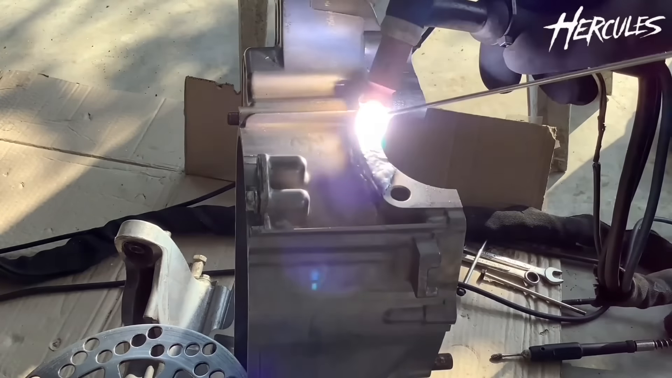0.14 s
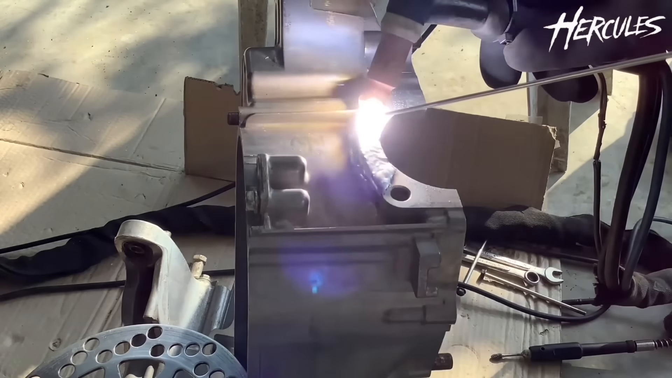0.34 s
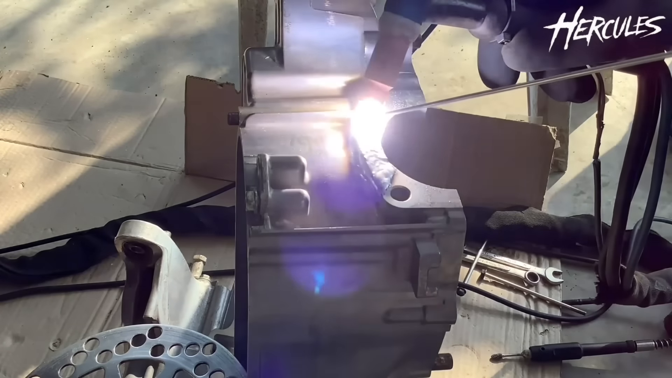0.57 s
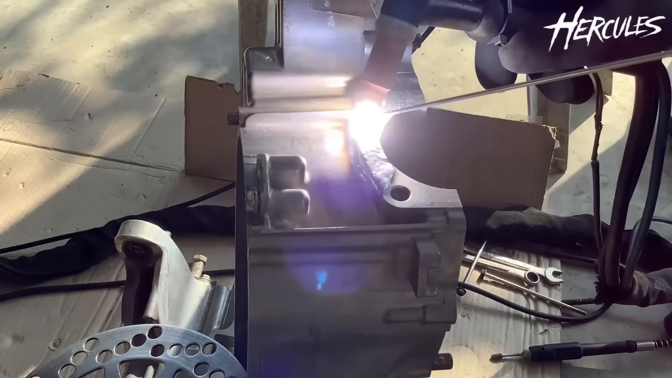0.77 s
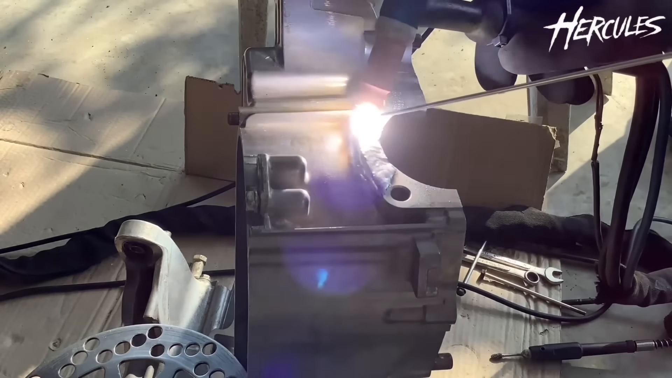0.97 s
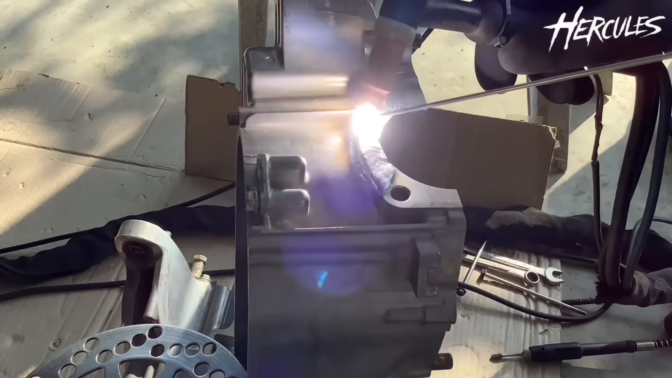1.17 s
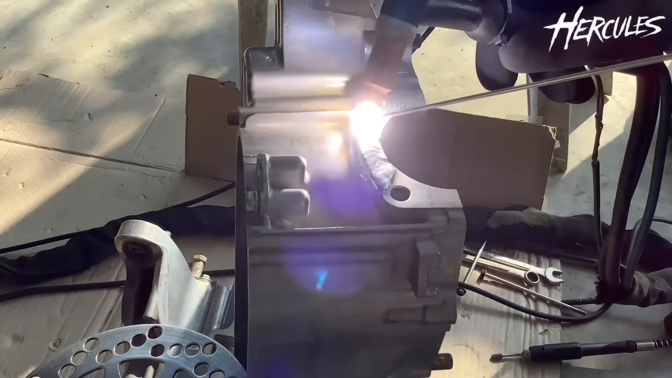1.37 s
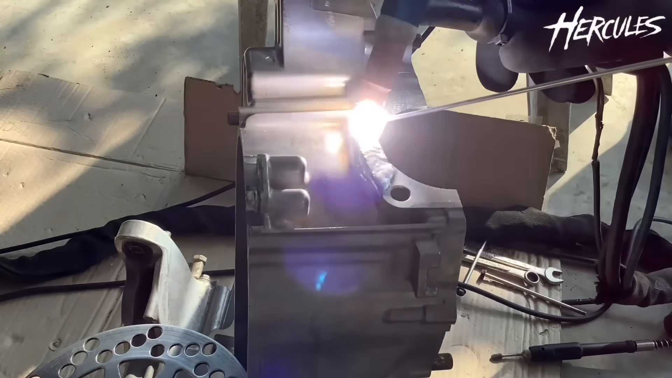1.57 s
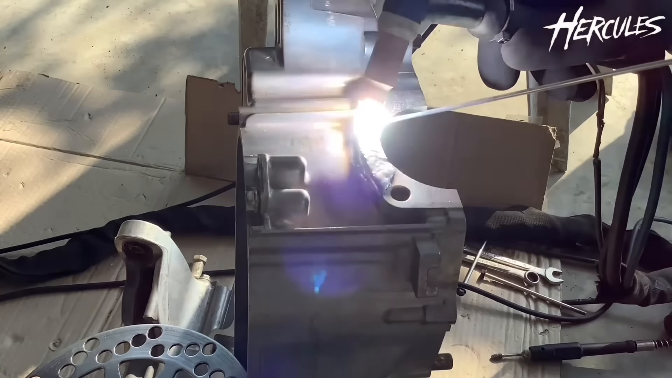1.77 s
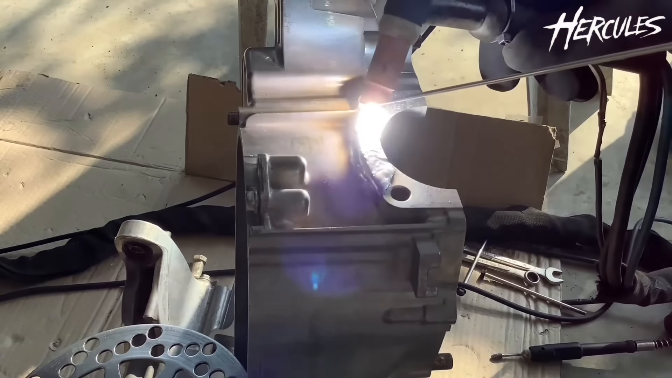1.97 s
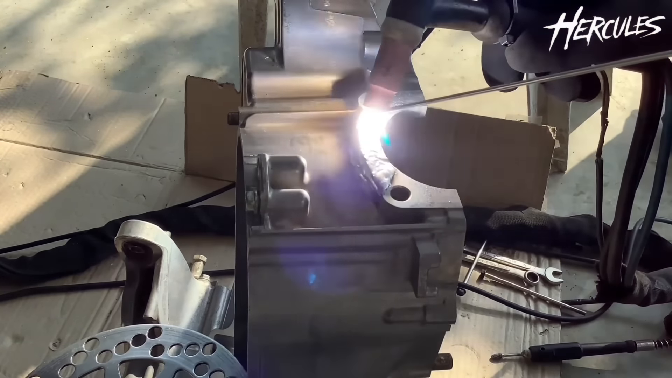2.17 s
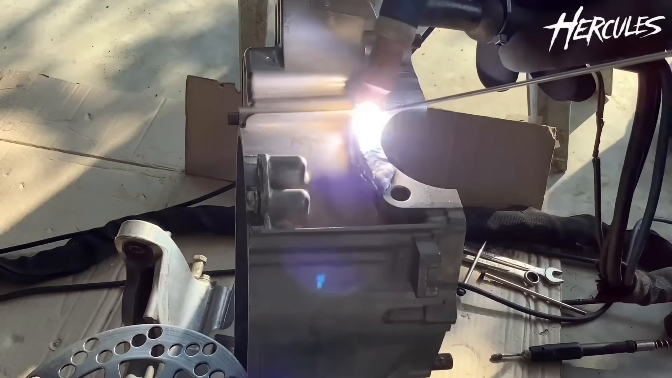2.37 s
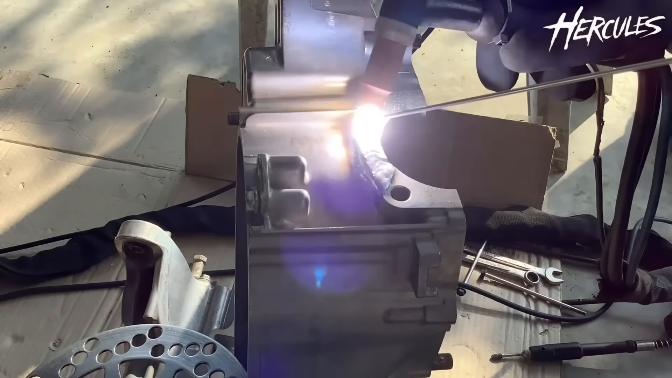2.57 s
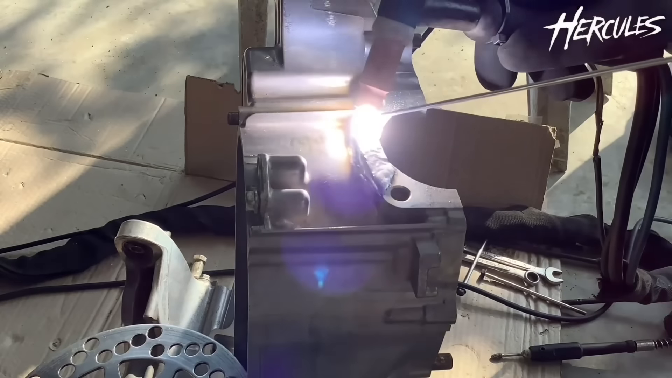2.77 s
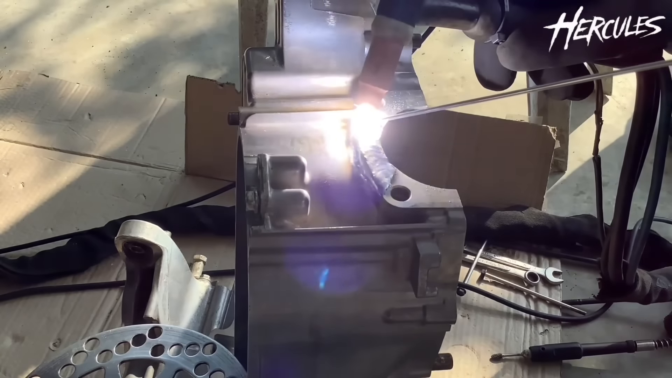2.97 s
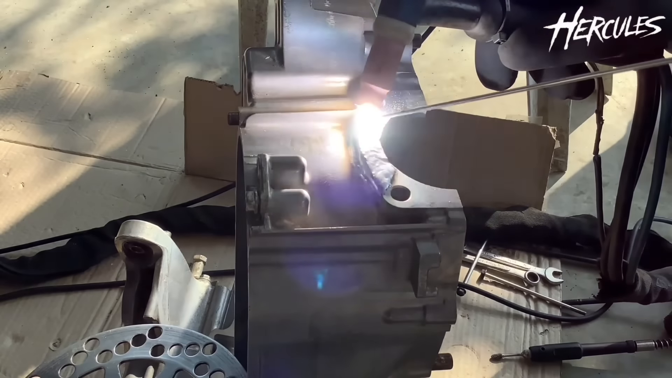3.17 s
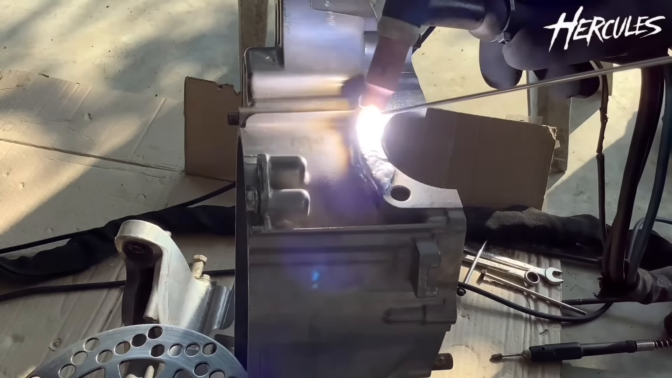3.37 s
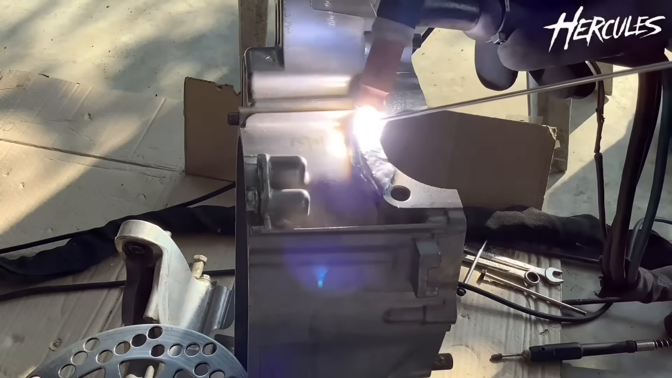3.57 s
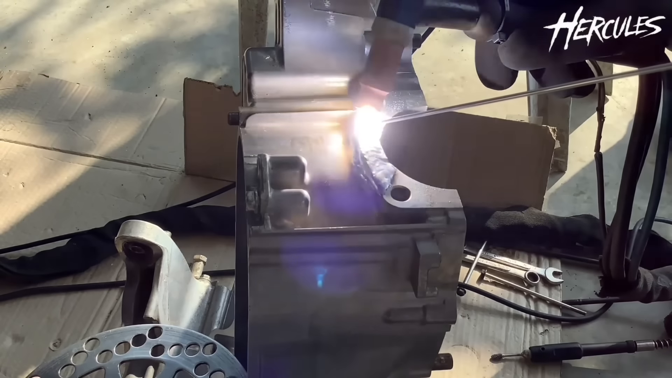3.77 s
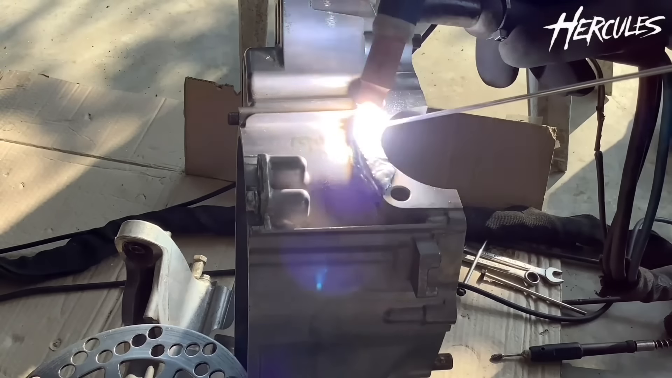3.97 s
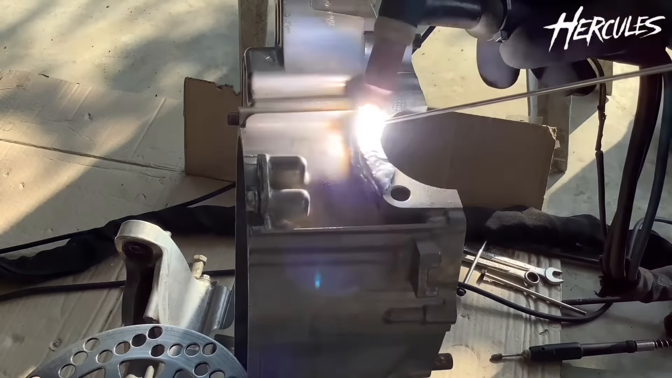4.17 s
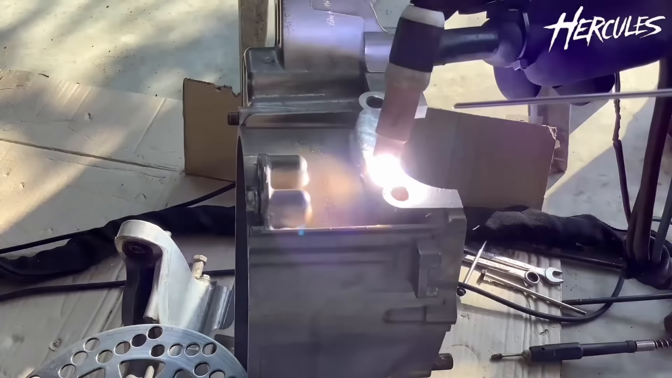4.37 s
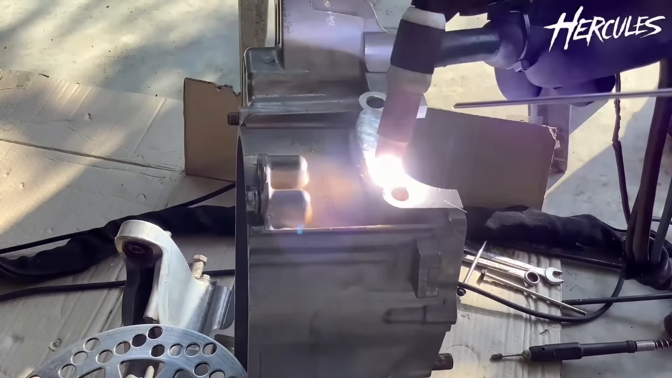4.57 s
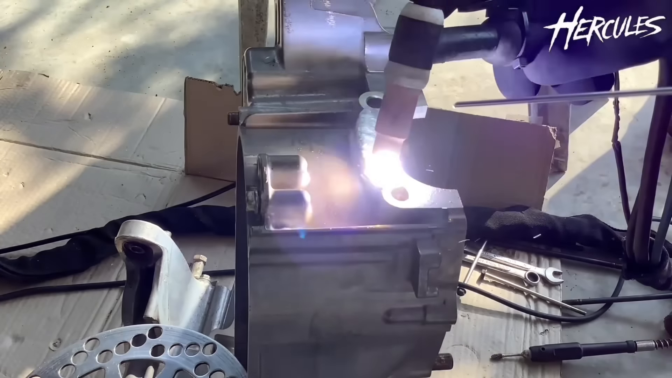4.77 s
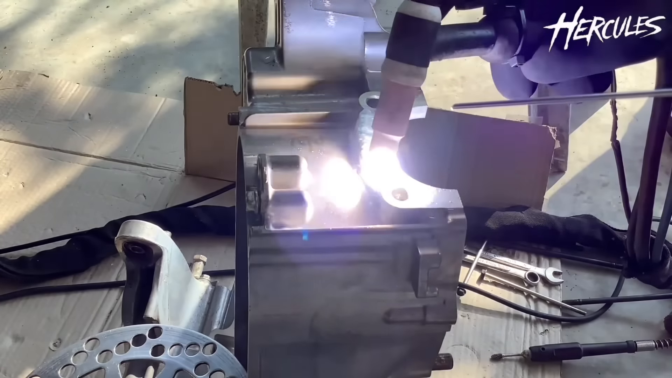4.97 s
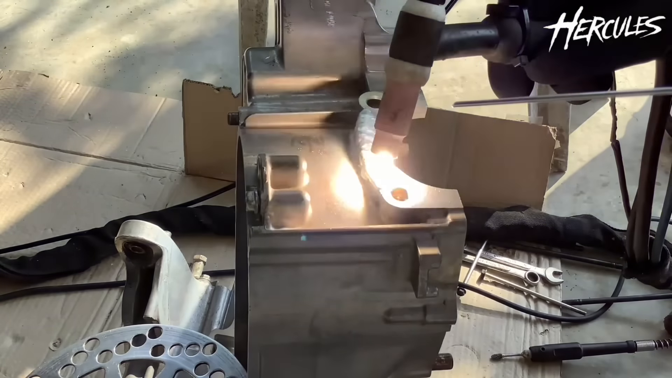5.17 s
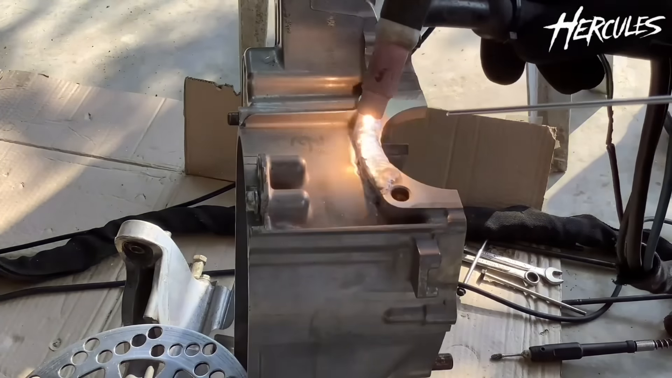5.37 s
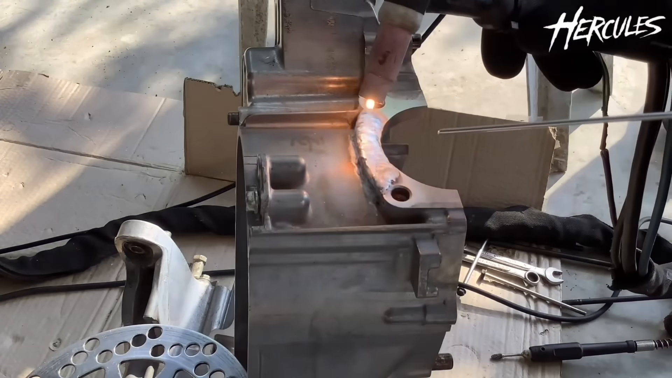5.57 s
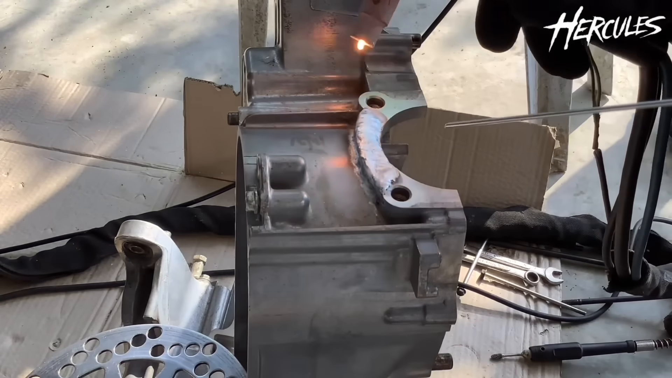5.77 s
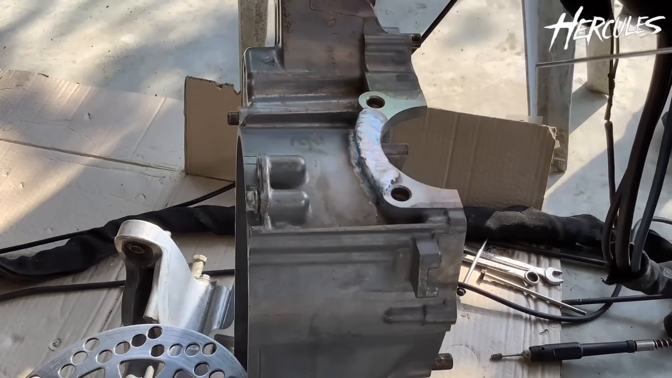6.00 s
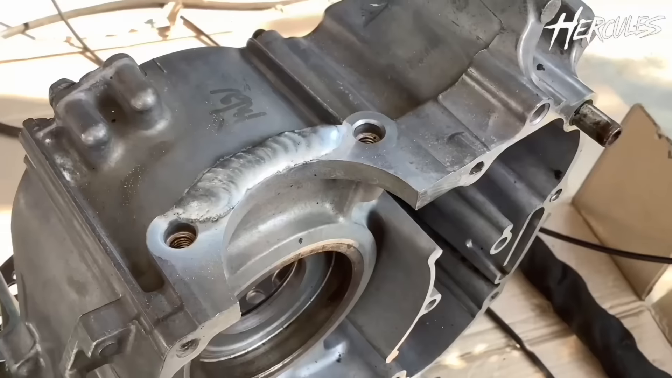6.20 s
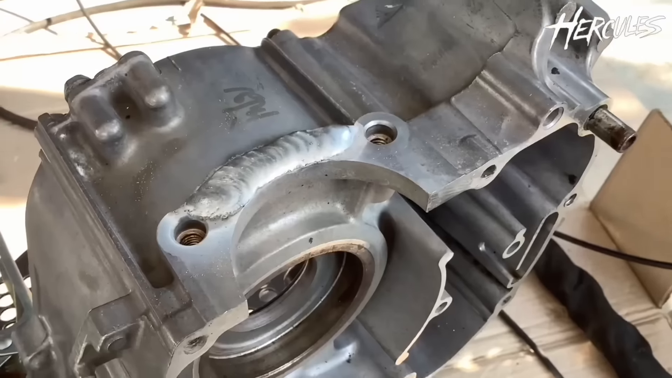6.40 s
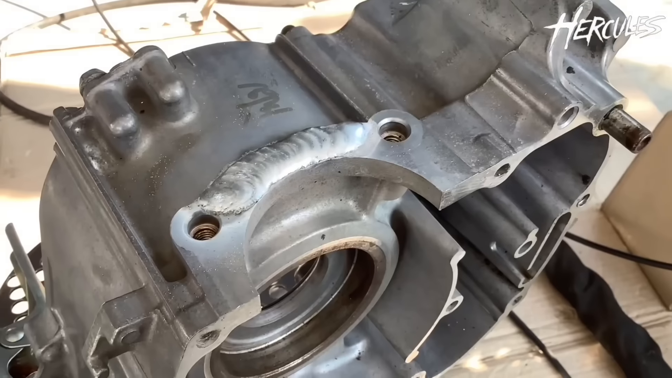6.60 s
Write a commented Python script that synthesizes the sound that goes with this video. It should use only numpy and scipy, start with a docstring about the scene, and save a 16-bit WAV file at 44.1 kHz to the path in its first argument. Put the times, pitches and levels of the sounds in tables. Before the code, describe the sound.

From the start, an electric welding arc burns on an aluminium casting close to the microphone, outdoors. It makes a harsh, steady buzz of rapid cracks, with a bright sizzle and a rough roar that swell and ease. Light wind puffs bump the microphone underneath. One sharper spit comes at about 1.7 seconds. At 4.2 seconds everything dips for an instant, and the arc resumes with a lower buzz and a few stronger puffs. It weakens just after 5 seconds and breaks with a crack at 5.2. The scene is then much quieter: gas hisses softly from the torch, and a distant engine growls until about 5.8 seconds. The hiss shifts in tone as the torch lifts, and the wind returns. After another brief dip at 6.2 seconds, only low wind buffeting and a faint, steady outdoor wash remain until the end, near 6.7 seconds.

```python
"""An alternating-current arc welds an aluminium casting outdoors, close by, while wind puffs hit the
microphone. The arc cracks at both reversals of the current and sizzles while the electrode is positive.
At 4.2 s the level dips briefly and a second pass begins; its current ramps down and the arc dies at
5.2 s. The shielding gas hisses on, an engine growls far off and the torch lifts. After another dip at
6.2 s only wind and the yard's steady wash remain."""
import sys
import numpy as np
from scipy import signal
from scipy.fft import rfft, irfft, next_fast_len
from scipy.io import wavfile
from scipy.ndimage import map_coordinates

SR = 44100
rng = np.random.default_rng(int(sys.argv[2]) if len(sys.argv) > 2 else 0)


def unload_audio(sound):
    """Save the sound as a 16-bit wav file, at the path given as the first command line argument."""
    columns = np.transpose(np.atleast_2d(sound))
    # keep every value between -1 and 1, then stretch to whole-number steps
    steps = np.round(np.clip(columns, -1, 1) * 32767)
    wavfile.write(sys.argv[1], SR, steps.astype(np.int16))


N = 292824

# Brief dips of the whole sound. Each row: centre in seconds, fade on either side in seconds.
DIPS = [(4.241, 0.029), (6.202, 0.024)]


def amp(db):
    """Gain of a level in dB."""
    return 10 ** (np.asarray(db) / 20)


def unit(x):
    """x at rms 1."""
    return x / np.sqrt(np.mean(x ** 2) + 1e-20)


def curves(rows):
    """One value per sample for each column after the time."""
    times, *columns = np.transpose(rows)
    return [np.interp(np.arange(N) / SR, times, column) for column in columns]


def wobble(rate):
    """A smooth random curve, rate knots a second."""
    knots = rng.standard_normal(int(N * rate / SR) + 4)
    return map_coordinates(knots, [np.arange(N) * rate / SR])


def filtered(x, response):
    """x through a complex frequency response."""
    size = next_fast_len(N + SR // 2)
    return irfft(rfft(x, size) * response(np.fft.rfftfreq(size, 1 / SR)), size)[:N]


def noise(spectrum):
    """Noise of rms 1 with a spectrum of (Hz, dB) points."""
    hz, db = np.transpose(spectrum)
    colour = lambda f: amp(np.interp(np.log(f + 1), np.log(hz), db))
    return unit(filtered(rng.standard_normal(N), colour))


def resonance(f, hz, width_hz):
    """A causal band-pass of gain 1 at its centre."""
    return 1j * f * width_hz / (hz * hz - f * f + 1j * f * width_hz)


def pulses(times, sizes):
    """Impulses placed between samples by a windowed sinc."""
    at = times[:, None] * SR
    taps = np.floor(at).astype(int) + np.arange(-15, 17)
    shape = np.sinc(taps - at) * np.cos(np.pi * (taps - at) / 34) ** 2
    inside = (taps >= 0) & (taps < N)
    return np.bincount(taps[inside], (sizes[:, None] * shape)[inside], N)


def cracks(times, db, hz, width_hz, stages=3):
    """Impulses coloured by a chain of equal band-passes."""
    return filtered(pulses(times, amp(db)), lambda f: resonance(f, hz, width_hz) ** stages)


def arc_cracks(timing, strike, reversal, unrest_db):
    """Two cracks a cycle: the strike opens the positive half and a brighter snap ends it."""
    first, end, current_hz, share = timing
    reversals = np.arange(first, end, 1 / current_hz)
    strikes = reversals - share / current_hz
    samples = (reversals * SR).astype(int)
    chance = np.clip(rng.standard_normal((len(reversals), 6)), -1.8, 1.8)
    late = np.abs(chance[:, 0]) * 1.3e-5 * amp(unrest_db[samples])  # a roaring arc strikes unevenly
    late += 6e-6 * wobble(2.7)[samples]  # the lag drifts as the hand changes the gap
    struck = sum(gain * cracks(strikes + late + ms / 1000, db + scatter * chance[:, 3 + k], hz, width)
                 for k, (ms, gain, hz, width, db, scatter) in enumerate(strike))
    hz, width, db, scatter = reversal
    snap = cracks(reversals + chance[:, 1] * 4e-6, db + scatter * chance[:, 2], hz, width)
    return amp(25 + 1.1 * wobble(9.2)) * struck, amp(24.5) * snap


def arc_burn(timing, unrest_db, spit_db):
    """The pool roars and spots sizzle over the oxide, mostly in the positive half of each cycle."""
    # Colours of the roar and the sizzle. Each row: frequency in Hz, level in dB.
    roar_spectrum = [(150, -60), (400, -4.5), (800, 0), (1350, 2), (2000, -4), (3500, -17), (6000, -60)]
    sizzle_spectrum = [(800, -49), (2200, -7.5), (4000, -4.5), (6500, -4), (9000, -2.5), (11000, -2.5),
                       (13000, -9.5), (16000, -20)]
    first, end, hz, share = timing
    t = np.arange(N) / SR
    start, onset_s = first - share / hz, .0006
    burning = (t > start) & (t < end)
    positive = burning & ((t - start - onset_s) * hz % 1 < share - onset_s * hz)
    gate = filtered(positive, lambda f: 1 / (1 + 2j * np.pi * f * 0.00033))  # edges of about 1 ms
    roar = noise(roar_spectrum) * (gate + 0.33 * burning)
    roar *= amp(-10 + unrest_db + 1.7 * wobble(130))
    oxide = amp(-5.5 + spit_db)
    sizzle = 0.87 * oxide * noise(sizzle_spectrum) * (gate + 0.24 * burning)
    sizzle *= amp(wobble(130) + 1.1 * wobble(1500))
    hum = amp(-32) * burning * np.sin(2 * np.pi * hz * t)  # the hot gas column breathes once a cycle
    cup_hiss = amp(-12) * burning * noise([(8000, -44), (11500, -4), (14000, 5), (16000, -5)])
    pool_sizzle = 0.72 * oxide * noise(sizzle_spectrum) * (gate + 0.19 * burning)
    return roar, sizzle + hum, pool_sizzle + cup_hiss


def past_casting(focused, spread, echoes, shadows):
    """The sound in the casting's shadow, and the treble it blocks; only the focused part echoes."""
    paths = lambda f: 1 + sum(gain * np.exp(-2j * np.pi * f * ms / 1000) for ms, gain in echoes)
    shade = lambda f: np.prod([1 - cut * resonance(f, hz, width) for hz, width, cut in shadows], axis=0)
    shaded = filtered(focused, lambda f: paths(f) * shade(f)) + filtered(spread, shade)
    treble = filtered(focused, lambda f: paths(f) * (1 - shade(f)) * resonance(f, 15000, 6000))
    return shaded, treble


def weld_pass(timing, strike, reversal, echoes, shadows, levels):
    """One pass of the arc; the final ramp-down of the current weakens all but strike and roar."""
    ramp_start_s, ramp_length_s, ramp_db = 5.08, 0.081, -6.5
    t = np.arange(N) / SR
    strength_db, unrest_db, spit_db = curves(levels)
    unrest_db += 1.2 * wobble(14)
    ramp = np.clip((t - ramp_start_s) / ramp_length_s, 0, 1)
    held, ramped = amp(strength_db), amp(strength_db + ramp_db * ramp)
    struck, snap = arc_cracks(timing, strike, reversal, unrest_db)
    roar, burn, spread = arc_burn(timing, unrest_db, spit_db)
    focused = held * struck + ramped * (snap + burn)
    shaded, treble = past_casting(focused, ramped * spread, echoes, shadows)
    top = filtered(shaded, lambda f: 1 / (1 + (8850 / (f + 1)) ** 6))
    shaded -= 0.74 * ramp * top  # the weaker current loses its top
    clear = 0.15 * np.clip((t - timing[0]) / 4, 0, 1) ** 2  # the torch moves out from behind the casting
    return shaded + clear * treble + held * roar


def welding_arc():
    """Two passes over the casting, the second buzzing lower; each table has one entry per pass."""
    # The current. Each row: first reversal and arc out in seconds, rate in Hz, positive share of a cycle.
    timings = [(.00192, 4.24, 131.118, .413), (4.23982, 5.213, 114.736, .4103)]
    # The strike and two slower heaves of hot gas behind it. Each row: lag in ms, signed gain,
    # centre and width in Hz, relative level and scatter in dB.
    strikes = [
        [(0, 0.66, 5680, 6560, 4.5, 2), (.185, -0.82, 1563, 1140, 2, 3), (.458, -0.93, 742, 810, -3, 2.5)],
        [(0, 0.54, 5340, 5950, 6.5, 3), (.182, -1, 1400, 1250, -4.5, 3), (1.231, 0.48, 625, 1875, 0, 3)],
    ]
    # The snap of the reversal. Each row: centre and width in Hz, relative level and scatter in dB.
    reversals = [(8770, 16600, 3.5, 0.5), (7500, 10800, 6, 0)]
    # Reflections off torch cup, casting and bench. Each row: delay in ms, signed gain.
    echoes = [
        [(0.148, -0.16), (0.283, 0.16), (0.352, 0.12), (0.422, -0.13), (0.661, 0.15), (0.86, -0.13),
         (1.075, -0.06), (1.169, -0.14), (1.446, -0.18), (1.828, -0.07), (1.878, -0.12), (1.994, -0.08),
         (2.059, 0.08), (2.153, 0.06), (2.274, -0.09), (2.546, 0.09), (2.736, 0.08), (3.03, -0.09),
         (3.082, -0.07), (3.873, -0.05)],
        [(0.162, -0.22), (0.261, 0.11), (0.322, 0.19), (0.472, -0.12), (0.74, 0.12), (0.817, 0.1), (1.06, -0.1),
         (1.321, -0.08), (1.365, -0.1), (1.59, 0.07), (1.801, -0.05), (1.984, 0.04), (2.065, 0.06),
         (2.358, -0.05), (2.506, 0.07), (2.921, 0.04), (3.46, -0.12), (3.507, -0.18), (3.563, -0.11),
         (3.745, 0.05)],
    ]
    # Bands the casting shadows. Each row: centre and width in Hz, share removed.
    shadows = [
        [(2360, 44, 0.11), (2545, 47, 0.26), (11710, 110, 0.91), (13300, 810, 0.65), (13300, 180, 0.55)],
        [(2280, 270, 0.94), (10700, 610, 0.36), (14900, 1800, 0.54)],
    ]
    # Each row: time in seconds, then arc strength, unrest of the pool and spitting of the oxide in dB.
    levels = [
        [(0, -26, 4.5, 3), (.12, -22, 2.5, 0.5), (.3, -23.5, 0.5, -2.5), (.95, -24.5, 0.5, -3.5),
         (1.05, -26, 7.5, 4.5), (1.25, -25.5, 3, 2), (1.64, -25, 2, -1.5), (1.68, -23, -4.5, 0),
         (1.9, -22, -4.5, -6), (2.05, -24.5, -2, -1), (2.31, -25, 8.5, 1.5), (2.42, -25, 2, -0.5),
         (2.9, -24, -2, -4.5), (3.3, -25, -1.5, -0.5), (3.41, -22, -4.5, -3), (3.5, -24.5, 0, -2),
         (4.2, -24, -3.5, -2.5)],
        [(4.29, -26.5, 3.5, 4.5), (4.46, -26.5, 3.5, 4), (4.6, -25.5, 2.5, 1), (5.0, -24.5, -3.5, -4.5),
         (5.08, -24.5, -4, -4), (5.15, -24.5, 0.5, 5)],
    ]
    return sum(weld_pass(*parts) for parts in zip(timings, strikes, reversals, echoes, shadows, levels))


def walls(x, level_db=-19, t60_s=0.058):
    """Nearby walls and bench answer with a short, bright wash of reflections."""
    t = np.arange(SR // 5) / SR
    tail = rng.standard_normal(len(t)) * amp(-60 * t / t60_s) * (t > .004)
    return amp(level_db) * signal.fftconvolve(x, tail / np.linalg.norm(tail))[:N]


def yard(after_dip):
    """A steady outdoor wash, a little louder and brighter after the second dip."""
    # Its colour before and after. Each row: frequency in Hz, level in dB.
    spectra = [
        [(120, -25.5), (200, -7.5), (334, -6.5), (628, -4), (1820, -11.5), (2450, -11.5), (5000, -25),
         (6500, -54), (11000, -120)],
        [(150, -20), (400, -5), (1000, 2.5), (1900, -3.5), (4000, -11.5), (6000, -20), (15800, -33)],
    ]
    # Its level before and after, in dB.
    levels_db = [-46.5, -43.5]
    return np.where(after_dip, amp(levels_db[1]) * noise(spectra[1]), amp(levels_db[0]) * noise(spectra[0]))


def wind_gusts(breeze_db=-59, rise_s=0.036, fall_s=0.079):
    """A fluttering breeze and its gusts press on the microphone: lumpy buffeting over a low rumble."""
    # Each row: start and hold in seconds, buffet level in dB, rumble relative to it in dB.
    gusts = [(0.021, 0.31, -36.5, -20), (0.416, 0.14, -40.5, -16), (.6, 0.14, -44.5, -14),
             (.79, .17, -38.5, -15), (1.03, 0.29, -45.5, -20), (1.402, .2, -37.5, -18),
             (1.657, .1, -45, -20), (1.933, 0.5, -46, -17), (2.598, 0.29, -49.5, -15),
             (3.118, 0.039, -43.5, -24), (3.243, 0.16, -48, -16), (3.8, 0.52, -59, -22),
             (4.29, 0.045, -34, -14), (4.416, 0.051, -48, -20), (4.563, 0.045, -58, -15),
             (4.76, .14, -52, -12), (4.937, 0.021, -44, -2), (5.114, 0.094, -41, -21),
             (5.8, .05, -37.5, -25), (5.88, 0.1, -38.5, -35), (5.95, .07, -45, -28),
             (6.048, 0.11, -39, -30), (6.217, 0.48, -40, -8)]
    # Colours of the buffet and the rumble. Each row: frequency in Hz, level in dB.
    buffet_spectrum = [(60, -34), (108, 2), (229, 3.5), (400, -7.5), (700, -15.5), (910, -12.5),
                       (1540, -120)]
    rumble_spectrum = [(12, -30), (30, -14), (65, -12), (100, -10), (200, -120)]
    t = np.arange(N) / SR
    moving = (t < 5.25) | (t > 5.8)  # still air in between
    buffet_gain = moving * amp(breeze_db + 3.5 * wobble(5.1))
    rumble_gain = moving * amp(breeze_db - 13)
    for start, hold, db, low_db in gusts:
        edges = np.minimum((t - start) / rise_s, (start + hold - t) / fall_s)
        swell = np.clip(edges + 1, 0, 1) ** 2
        buffet_gain += amp(db) * swell
        rumble_gain += amp(db + low_db) * swell
    buffet = unit(amp(2.8 * wobble(30)) * noise(buffet_spectrum))
    rumble = unit(amp(3.3 * wobble(12)) * noise(rumble_spectrum))
    return buffet_gain * buffet + rumble_gain * rumble


def wind_puffs(t60_s=0.054, bass_cut_hz=60):
    """Single puffs ring down from high to low through the microphone's bass cut."""
    # Each row: start in seconds, strength in dB, opening pace in ms (longer sounds lower).
    puffs = [(.159, -17.5, 1.56), (.22, -22, 3.6), (.235, -18, 1.6), (0.474, -22.5, 1.4), (1.501, -19, .81),
             (2.757, -22.5, 3.5), (3.136, -33, 2.8), (3.316, -27, 4), (4.2716, -9.5, .6),
             (4.323, -17, 0.84), (4.4105, -17, 0.56), (4.4545, -13.5, 0.56), (4.573, -27.5, 1.7),
             (4.964, -22, 0.93), (5.138, -21, 1.14), (5.147, -24, 0.89), (5.181, -18.5, .6),
             (5.876, -19, 6.2), (5.889, -22, 4.8), (5.929, -25, 3.6), (6.063, -22.5, 2.9),
             (6.159, -17, 3.7), (6.239, -34, 3.6), (6.467, -25.5, 4.6)]
    track = np.zeros(N + SR)
    t = np.arange(SR // 10) / SR
    for start, db, pace_ms in puffs:
        fall = np.sin(7.77 * np.log(1 + 1000 * t / pace_ms))  # each half swing outlasts the one before
        envelope = amp(db - 60 * t / t60_s) * (1 - np.exp(-4000 * t / pace_ms))
        track[round(start * SR):][:len(t)] -= envelope * fall
    return filtered(track[:N], lambda f: (1j * f / (bass_cut_hz + 1j * f)) ** 2)


def spits():
    """Single hard, broad cracks, the last as the arc breaks."""
    # Each row: time in seconds, strength in dB, centre in Hz.
    hits = [(1.692, 8, 2200), (5.2101, 3, 4930)]
    return sum(cracks(np.array([s]), [db], hz, 2 * hz, stages=2) for s, db, hz in hits)


def shielding_gas(level_db=-45):
    """As the torch lifts the jet meets its own reflection; the notch climbs as the detour shrinks."""
    # Torch height. Each row: time in seconds, lift from 0 to 1.
    lift = [(5.2, 0.04), (5.7, 0.06), (5.8, 0.8), (5.9, .82), (6.2, 0.54)]
    # The extra path off the casting. Each row: time in seconds, delay in ms.
    detour = [(5.72, .2), (5.85, .165), (6.02, .137), (6.15, .155)]
    # The jet near the weld, then in free air. Each row: frequency in Hz, level in dB.
    spectra = [
        [(1760, -46), (3000, -32), (3450, -18), (3990, -6), (4620, -11), (5230, -0.5), (5610, -7), (5970, -4),
         (8160, -3.5), (8870, -2), (9450, 2), (10200, -10), (11000, -10), (12900, -15), (15800, -15)],
        [(1470, -44), (2500, -14), (3460, -2), (5120, -23), (5890, -5), (8930, -4), (10700, -12), (15800, -13)],
    ]
    (lifted,), (delay_ms,) = curves(lift), curves(detour)
    near, free = noise(spectra[0]), noise(spectra[1])
    bounced = map_coordinates(free, [np.arange(N) - delay_ms * SR / 1000])
    return amp(level_db) * (np.sqrt(1 - lifted) * near + np.sqrt(lifted) * (free + .7 * bounced))


def engine(jitter_s=.0008, scatter_db=1.5):
    """A far engine growls briefly: four uneven firings a cycle through the exhaust pipe."""
    # Each row: time in seconds, cycle rate in Hz, level in dB.
    revs = [(5.28, 29.2, -37), (5.48, 28.6, -35), (5.54, 29.16, -33.5), (5.79, 29.67, -32.5)]
    # Each row: a firing's place in the cycle from 0 to 1, relative strength in dB.
    firings = [(0, 3), (.27, -8), (.48, -3), (.76, -16)]
    # Pipe resonances. Each row: centre and width in Hz, relative level in dB.
    exhaust = [(115, 50, 6), (189, 25, 9.5), (324, 80, 1.5)]
    cycle_hz, level_db = curves(revs)
    t = np.arange(N) / SR
    turns = np.cumsum(cycle_hz) / SR + 0.169
    cycles = np.arange(1, int(turns[-1]))
    train = np.zeros(N)
    for place, db in firings:
        times = np.interp(cycles + place, turns, t) + jitter_s * rng.standard_normal(len(cycles))
        train += pulses(times, amp(db + scatter_db * rng.standard_normal(len(cycles))))
    pipe = lambda f: sum((-1) ** k * amp(db) * resonance(f, hz, width)
                         for k, (hz, width, db) in enumerate(exhaust))
    growl = filtered(train, lambda f: pipe(f) * resonance(f, 243, 480) ** 2)
    heard = np.interp(t, [5.21, 5.33, 5.785, 5.81], [0, 1, 1, 0])
    return heard * amp(level_db) * growl / np.sqrt(np.mean(growl[heard > 0] ** 2))


def scene():
    """The mono mix; the gas flows from the start until the second dip."""
    after_dip = np.arange(N) / SR > DIPS[1][0]
    bed = yard(after_dip) + shielding_gas() * ~after_dip
    arc = welding_arc() + spits()
    return (arc + walls(arc) + wind_gusts() + wind_puffs() + engine() + bed)[None]


def record(dry):
    """The level dips briefly twice, and the very top is cut off."""
    top_hz = 15830
    t = np.arange(N) / SR
    fades = np.prod([np.clip(np.abs(t - centre) / fade, .02, 1) for centre, fade in DIPS], axis=0)
    return filtered(dry[0] * fades, lambda hz: hz < top_hz)[None]


dry = scene()
out = record(dry)
unload_audio(out)
```